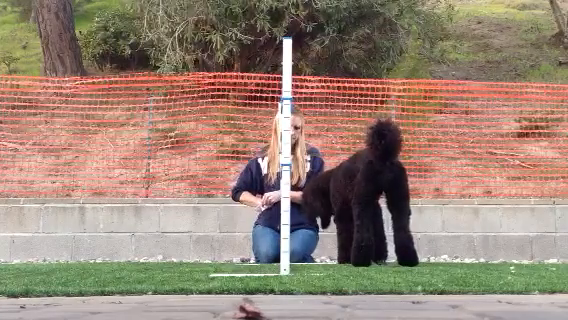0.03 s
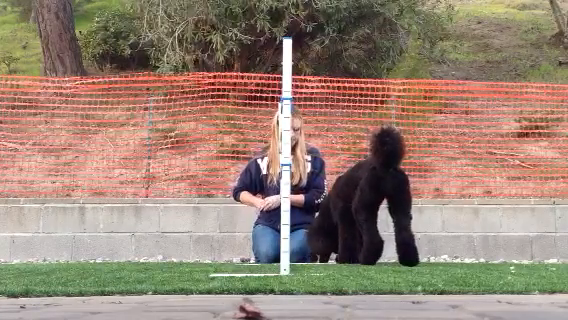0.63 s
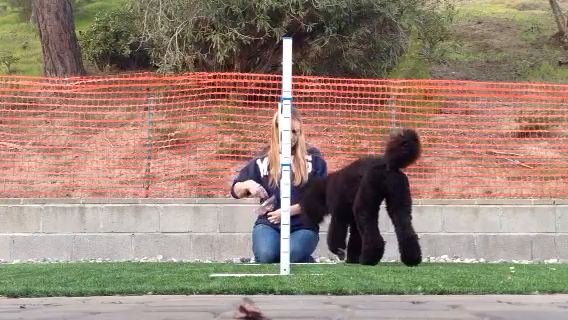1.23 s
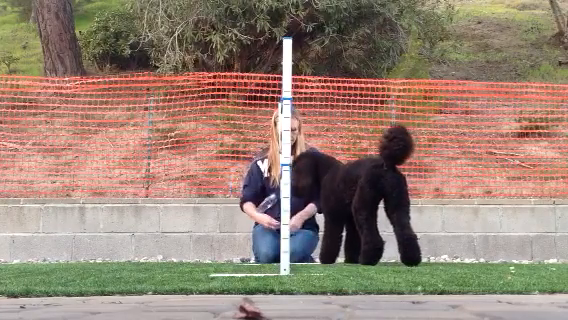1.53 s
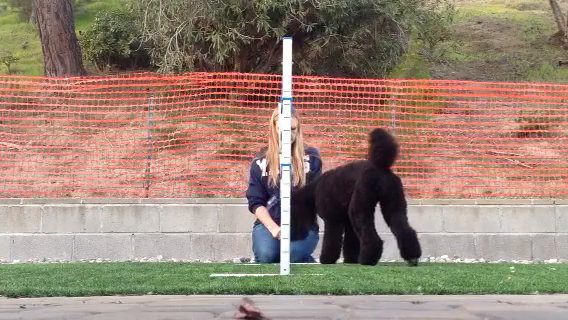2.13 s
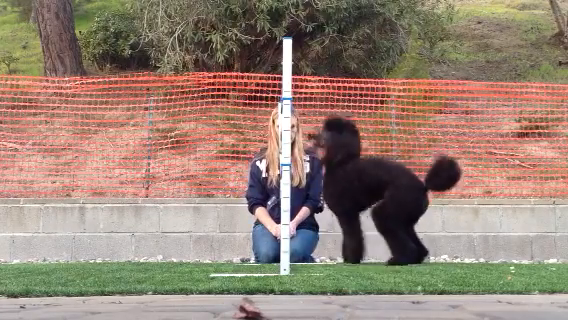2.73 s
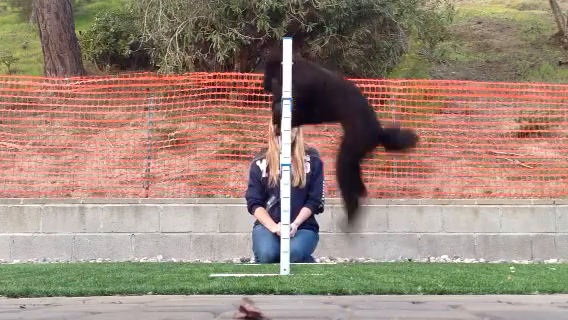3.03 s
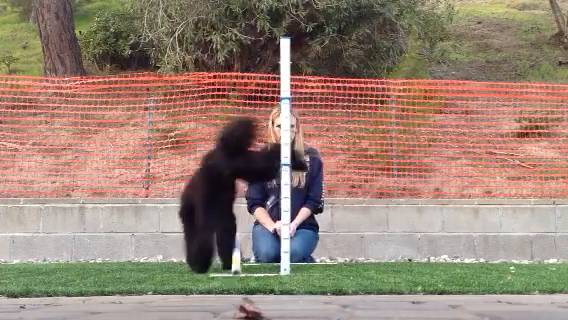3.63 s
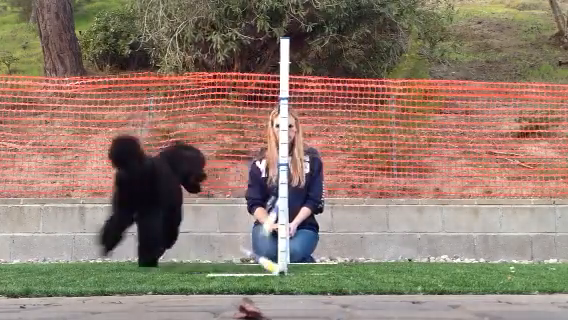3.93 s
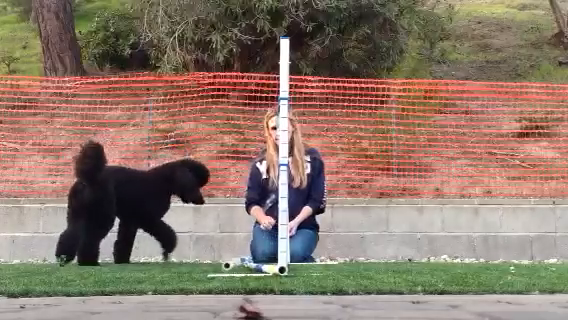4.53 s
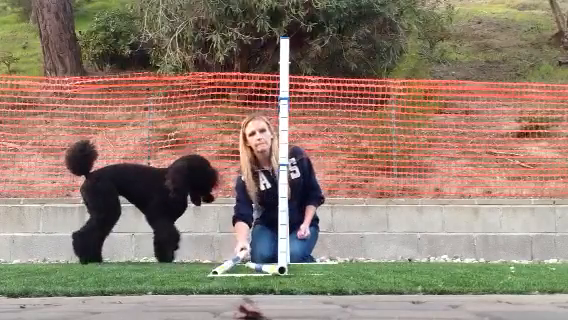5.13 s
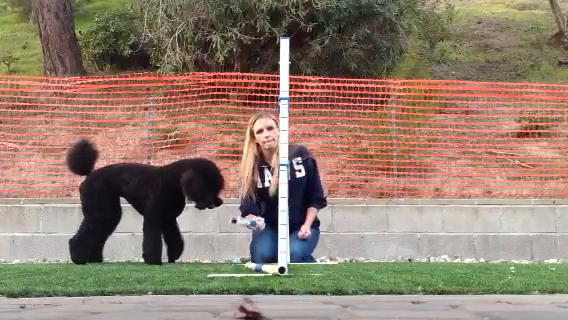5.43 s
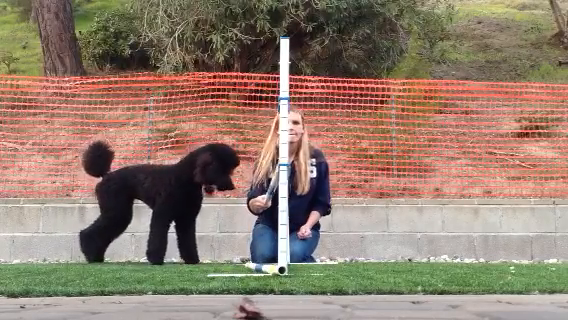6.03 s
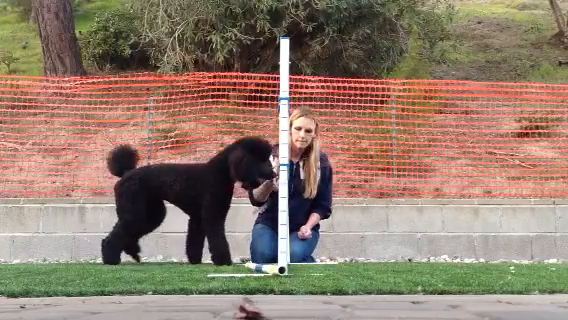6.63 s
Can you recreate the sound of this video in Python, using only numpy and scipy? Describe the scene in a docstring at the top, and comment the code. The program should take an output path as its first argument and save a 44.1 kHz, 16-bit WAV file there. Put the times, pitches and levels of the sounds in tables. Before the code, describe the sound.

Far traffic hums quietly outdoors under a soft rustle of clothing and a few light paw steps. About halfway through, a plastic tube clatters off its supports, gives one sharp, hollow crack and tumbles onto turf, each knock ringing briefly in the yard. A bird peeps faintly once, and near the end a small clicker snaps twice in quick succession. A distant insect is barely audible behind it all.

```python
"""A walled yard: a dog clips a hollow plastic jump bar, which rattles off its cups, cracks against the
upright and bounces end over end on the grass, each impact exciting the tube's damped normal modes.
Paws and clothes rustle by friction. Later a training clicker is pressed and let go, its steel tongue
snapping over and ringing its box. Distant traffic murmurs behind it all, with a faint insect and one
peep of a bird."""
import sys
import numpy as np
from scipy import signal
from scipy.fft import rfft, irfft
from scipy.io import wavfile
from scipy.ndimage import uniform_filter1d

SR = 44100
rng = np.random.default_rng(int(sys.argv[2]) if len(sys.argv) > 2 else 0)


def master_out(mix):
    """Clip the mix to full scale and print it as 16-bit PCM to the path in sys.argv[1]."""
    frames = np.transpose(np.atleast_2d(mix))
    ceiling = np.clip(frames, -1, 1)
    pcm = np.round(ceiling * 32767).astype(np.int16)
    wavfile.write(sys.argv[1], SR, pcm)


N = 302967
TIME = np.arange(N) / SR
SHORT = TIME[:SR // 2]

# loudness of the distant traffic, in two runs of points: t/s, level/dB
TRAFFIC_LEVEL = [
    [(0.0, -57), (0.92, -59), (2.07, -57), (3.3, -57)],
    [(4.9, -61), (6.074, -60.5), (6.254, -60), (6.87, -59)],
]
# spectral densities of traffic rumble, tyre noise and steady hiss: f/Hz, level/dB
RUMBLE_SPECTRUM = [(20, -28.5), (50, -28), (80, -11.5), (110, -4.5), (140, 2.5), (190, 2), (260, -0.5),
                   (400, -9), (800, -27)]
TYRE_SPECTRUM = [(150, -24.5), (300, 2), (450, 3), (900, 5), (1300, 1.5), (1700, -3.5), (2300, -8.5),
                 (3500, -19.5), (8000, -43)]
HISS_SPECTRUM = [(1000, -2), (2500, -4), (4000, -3.5), (5400, -5.5), (6200, -5.5), (9000, -6),
                 (15500, -10.5)]

# movements of clothes and grass: middle t/s, half-width/s, level/dB
MOVEMENTS = [(0.017, 0.095, -56), (0.238, .1, -63.5), (0.406, 0.054, -56.5), (0.559, 0.082, -57),
             (0.953, 0.23, -62.5), (1.155, 0.094, -59)]
# crisp ticks in the rustle: t/s, level/dB
RUSTLE_TICKS = [(.014, -57), (0.053, -56), (0.385, -55), (.404, -56), (0.602, -53.5), (.831, -64),
                (0.9354, -57), (1.0523, -55), (1.208, -62), (3.167, -59.5), (6.08, -70)]
# paws on the turf: t/s, brush level/dB, thud level/dB
PAW_SCUFFS = [(2.296, -60.5, -52.5), (2.754, -64, -66), (4.636, -57, -58.5), (5.574, -65.5, -62)]
# spectral densities of the rustle, a tick and a paw's thud: f/Hz, level/dB
RUSTLE_SPECTRUM = [(800, -5), (2000, -3.5), (3500, -4), (5500, -4), (8000, -8.5), (12000, -11.5),
                   (15500, -10.5)]
TICK_SPECTRUM = [(800, -14), (3000, -5), (6000, -1), (13000, 0)]
PAW_SPECTRUM = [(150, -37), (350, -8), (550, -2), (900, -10.5), (2500, -30)]

# bar on cups, upright and ground: t/s, ring level/dB, crack level/dB, centre f/Hz, chatter time/s
BAR_IMPACTS = [ (3.348, -52, -52, 1020, 0.0047), (3.376, -44.5, -48, 1040, .0014),
               (3.396, -40, -37.5, 900, 0.015), (3.407, -40, -32.5, 950, .003),
               (3.479, -42.5, -47.5, 990, 0.0056), (3.502, -31.5, -40, 930, 0.004),
               (3.506, -36, -27, 1040, .011), (3.5718, -45, -37, 1102, 0.0074),
               (3.585, -30.5, -29.5, 1020, 0.0058), (3.6718, -10, -19.5, 1560, .0018),
               (3.6746, -10, -17.5, 1800, .0035), (3.739, -28.5, -29, 1040, 0.0075),
               (3.7508, -17, -31, 1560, .001), (3.829, -38.5, -50, 1030, 0.01),
               (3.958, -41, -39, 1120, 0.0042), (4.005, -27.5, -32.5, 2420, 0.016),
               (4.008, -31, -38, 810, 0.018), (4.046, -25.5, -30.5, 1020, 0.014),
               (4.154, -38, -47, 1150, 0.01), (4.172, -22, -29, 1030, 0.009),
               (4.225, -37, -42, 1570, 0.0094), (4.276, -37.5, -57, 1210, 0.0043),
               (4.408, -40, -54, 1080, 0.011), ]
# normal modes of the tube: f/Hz, level/dB, T60/s
TUBE_MODES = [(590, -4, .06), (770, -2, .05), (830, -2, .05), (880, -4, .07), (965, -3, .05),
              (1114, -1, .07), (1160, -3, .05), (1250, -4, .035), (1330, 0, .055), (1400, -4, .04),
              (1460, -3, .045), (1641, 1, .07), (1722, 4, .065), (1895, -1, .06), (2070, -7, .04),
              (2250, -6, .055), (2480, -5, .04), (2570, -8, .05), (2682, -3, .065), (2998, -9, .05),
              (3352, -5, .05)]
# spectral densities of the plastic's crack, the ground's thump and the turf's thud: f/Hz, level/dB
CRACK_SPECTRUM = [(40, -42), (150, -16), (350, -5), (600, 0.5), (1000, -1), (2000, 1), (3000, 3),
                  (4000, 3.5), (4800, 5), (7500, 3), (10000, 0), (14000, 0), (16000, -12.5)]
THUMP_SPECTRUM = [(25, 3.5), (70, -4), (200, -1), (400, -13), (1000, -44.5)]
TURF_SPECTRUM = [(150, -30), (330, -1), (550, 1), (900, -10), (2500, -29)]
# reverberation time of the yard: f/Hz, T60/s
YARD_DECAY = [(200, 0.34), (1200, 0.29), (4000, 0.34), (9000, 0.218), (15000, 0.34)]
# bar sliding in its cups, down the upright and through grass: t/s, duration/s, level/dB, fade/(dB/s)
BAR_SLIDES = [(3.383, 0.27, -43, 170), (3.691, 0.083, -28.5, 170), (4.168, 0.024, -40.5, 157),
              (4.272, 0.033, -53.5, 67)]

# clicker pressed and let go: t/s, box level/dB, box centre f/Hz, tongue level/dB, snap level/dB
CLICKER_SNAPS = [(6.1968, -35.5, 1140, -36.5, -41.5), (6.3183, -50, 1050, -60, -59),
                 (6.34, -42.5, 935, -45.5, -44), (6.3423, -44, 960, -44, -43.5)]
# normal modes of its plastic box and steel tongue: f/Hz, level/dB, T60/s
BOX_MODES = [(880, -6, .035), (950, -3, .04), (1100, -4, .035), (1163, 0, .05), (1400, -8, .02),
             (1572, -4, .025), (2050, -4, .02)]
TONGUE_MODES = [(1750, -3, .012), (2200, -7, .01), (3219, 0, .018), (3400, -2, .012), (3850, 1, .012),
                (4400, -4, .008), (5600, -2, .008), (6900, -8, .008), (8409, -9, .008), (11800, -8, .006),
                (13700, -7, .006)]
# spectral density of its snap: f/Hz, level/dB
SNAP_SPECTRUM = [(400, -20), (950, 2), (1600, 3), (2700, -1), (4500, 2), (8000, -3), (14000, -5)]


def from_db(db):
    """Amplitude ratio of a level in decibels."""
    return 10 ** (np.asarray(db) / 20)


def unit_rms(x):
    """Power normalisation to rms 1."""
    return x / np.sqrt(np.mean(x ** 2) + 1e-20)


def unit_burst(x):
    """Energy normalisation to that of 10 ms at rms 1."""
    return x / np.sqrt(np.sum(x ** 2) / (SR / 100) + 1e-20)


def at_hz(points, hz):
    """Interpolation on a logarithmic frequency axis."""
    f, value = np.transpose(points)
    return np.interp(np.log(np.maximum(hz, 1)), np.log(f), value)


def colour(x, spectrum, size=4096):
    """Minimum-phase filtering: folding the cepstrum makes the response causal."""
    cepstrum = irfft(np.log(from_db(at_hz(spectrum, np.fft.rfftfreq(size, 1 / SR)))))
    cepstrum[1:size // 2] *= 2
    cepstrum[size // 2 + 1:] = 0
    response = irfft(np.exp(rfft(cepstrum)))
    return signal.fftconvolve(x, response)[:len(x)]


def noise(spectrum):
    """Stationary coloured noise of rms 1."""
    return unit_rms(colour(rng.standard_normal(N), spectrum))


def fluctuation(samples):
    """A moving average of white noise wanders slowly, at rms 1."""
    return unit_rms(uniform_filter1d(rng.standard_normal(N), size=samples))


def swell(middle_s, half_width_s):
    """Gaussian envelope of height 1, down to 1/e at the half-width."""
    return np.exp(-((TIME - middle_s) / half_width_s) ** 2)


def add(out, s, sound):
    """Superposition of a sound starting at time s."""
    at = int(s * SR)
    out[at:at + len(sound)] += sound[:len(out) - at]


def ring(force, modes, low_hz=620):
    """Damped modes sum with a sign and strength set by the driving point; a thin body radiates no bass."""
    out = 0
    for hz, db, t60 in modes:
        radius, angle = from_db(-60 / (t60 * SR)), 2 * np.pi * hz / SR
        mode = signal.lfilter([1, 0, -1], [1, -2 * radius * np.cos(angle), radius * radius], force)
        out = out + unit_burst(mode) * from_db(db + rng.standard_normal()) * rng.choice([-1, 1])
    return unit_burst(signal.sosfilt(signal.butter(4, low_hz, "high", fs=SR, output="sos"), out))


def background(rumble_db=-3.5, tyres_db=-0.5, engine_hz=173, engine_db=-61.5, hiss_db=-69):
    """Incoherent sources add: far traffic, an engine drone that swells and fades once, an even hiss."""
    times, levels = np.vstack(TRAFFIC_LEVEL).T
    level_db = np.interp(TIME, times, levels)
    rumble = from_db(level_db + rumble_db) * noise(RUMBLE_SPECTRUM)
    tyres = from_db(level_db + tyres_db) * noise(TYRE_SPECTRUM)
    pitch_hz = engine_hz * (1 + .03 * fluctuation(samples=4000))
    drone = np.sqrt(2) * np.sin(2 * np.pi * np.cumsum(pitch_hz) / SR)
    engine = from_db(engine_db) * swell(middle_s=0.32, half_width_s=0.38) * drone
    return rumble + tyres + engine + from_db(hiss_db) * noise(HISS_SPECTRUM)


def insect(level_db=-76.5, hz=5350, pulses_per_s=6.6):
    """Amplitude modulation of a narrow noise band gives a far insect's soft, uneven chirr."""
    pace = pulses_per_s * (1 + .25 * fluctuation(samples=6000))
    pulses = np.sin(np.pi * np.cumsum(pace) / SR) ** 2 * from_db(2 * fluctuation(samples=6000))
    carrier = ring(rng.standard_normal(N), [(hz, 0, .003)])
    return from_db(level_db) * unit_rms(carrier * pulses)


def friction(clump_samples, clump_db, grain_db=4):
    """Friction is a dense run of tiny slips whose log-normal strengths come in clumps."""
    strength_db = clump_db * fluctuation(clump_samples) + grain_db * rng.standard_normal(N)
    return rng.standard_normal(N) * from_db(strength_db)


def contact(chatter_s, grain_db):
    """The force of an impact is an exponentially dying cluster of tiny uneven touches."""
    touches = rng.standard_normal(len(SHORT)) * from_db(grain_db * rng.standard_normal(len(SHORT)))
    return touches * np.exp(-SHORT / chatter_s)


def burst(spectrum, chatter_s, grain_db):
    """A filtered contact force gives a transient without ringing modes."""
    return unit_burst(colour(contact(chatter_s, grain_db), spectrum))


def rustle(trim_db=-1):
    """Friction noise of cloth and grass follows each movement, with a few crisp ticks on top."""
    motion = sum(from_db(db) * swell(s, half_width_s) for s, half_width_s, db in MOVEMENTS)
    rubbing = unit_rms(colour(friction(clump_samples=150, clump_db=3.5), RUSTLE_SPECTRUM))
    out = from_db(trim_db) * motion * rubbing
    for s, db in RUSTLE_TICKS:
        add(out, s, from_db(db) * burst(TICK_SPECTRUM, chatter_s=.0015, grain_db=2))
    return out


def paws(rise_s=0.0265):
    """Soft contact builds slowly: a paw brushes the blades and presses dully into the ground."""
    out, blades, ground = np.zeros(N), noise(RUSTLE_SPECTRUM), noise(PAW_SPECTRUM)
    for s, brush_db, thud_db in PAW_SCUFFS:
        age = np.maximum(TIME - s, 0) / rise_s
        out += age * np.exp(1 - age) * (from_db(brush_db) * blades + from_db(thud_db) * ground)
    return out


def favour(modes, centre_hz, focus_db):
    """Selective excitation: the place of contact drives the modes near one frequency most strongly."""
    return [(hz, db - focus_db * np.log2(hz / centre_hz) ** 2, t60) for hz, db, t60 in modes]


def blow(ring_db, crack_db, centre_hz, chatter_s, treble_hz=4800):
    """One impact force gives both modal ringing and a broadband crack, duller for soft contacts."""
    force = contact(chatter_s, grain_db=5.5)
    tube = ring(force, favour(TUBE_MODES, centre_hz, focus_db=20))
    tilt_db_per_octave = 0.2 * (crack_db - ring_db)
    spectrum = [(hz, db + tilt_db_per_octave * max(np.log2(hz / treble_hz), 0))
                for hz, db in CRACK_SPECTRUM]
    crack = unit_burst(colour(force, spectrum))
    return from_db(ring_db) * tube + from_db(crack_db) * crack


def yard(x, wet_db, build_s):
    """Scattering from wall, bank and bushes adds a short diffuse tail, different for each spot."""
    tail, edges_hz = 0, np.geomspace(150, 18000, 6)
    for low, high in zip(edges_hz, edges_hz[1:]):
        bandpass = signal.butter(2, [low, high], "band", fs=SR, output="sos")
        band = signal.sosfilt(bandpass, rng.standard_normal(len(SHORT)))
        t60 = at_hz(YARD_DECAY, np.sqrt(low * high))
        tail = tail + band * from_db(-60 * SHORT / t60)
    tail = tail * (1 - np.exp(-(SHORT / build_s) ** 2))
    return x + from_db(wet_db) * signal.fftconvolve(x, tail / np.linalg.norm(tail))[:len(x)]


def bar_impacts(rebound_s=.0118, touchdown_s=4.03, thump_re_ring_db=-40, turf_re_ring_db=-18.5):
    """Elastic rebound: the tube slaps back after each blow, weaker and less cleanly, over a low thump."""
    out = np.zeros(N)
    for s, ring_db, crack_db, centre_hz, chatter_s in BAR_IMPACTS:
        knock = blow(ring_db, crack_db, centre_hz, chatter_s)
        rebound = blow(ring_db - 11.5, crack_db - 2.5, centre_hz, chatter_s + 0.0039)
        add(knock, rebound_s, rebound)
        add(out, s, yard(knock, wet_db=-10, build_s=0.0063))
        thump = burst(THUMP_SPECTRUM, chatter_s=0.01225, grain_db=-0.5)
        add(out, s, from_db(ring_db + thump_re_ring_db) * thump)
        if s > touchdown_s:   # landings on the turf add a hollow thud
            thud = burst(TURF_SPECTRUM, chatter_s=0.053, grain_db=-0.5)
            add(out, s, from_db(ring_db + turf_re_ring_db) * thud)
    return out


def bar_slides(attack_s=0.024, tube_db=-4):
    """Frictional excitation: the sliding bar's slips hiss and keep its lower modes ringing."""
    pressure = np.zeros(N)
    for s, duration_s, db, fade_db_per_s in BAR_SLIDES:
        onset = np.clip((TIME - s) / attack_s, 0, 1)
        pressure += onset * from_db(db - fade_db_per_s * np.maximum(TIME - s - duration_s, 0))
    slips = friction(clump_samples=250, clump_db=3)
    hiss = unit_rms(colour(slips, CRACK_SPECTRUM))
    tube = unit_rms(ring(slips, favour(TUBE_MODES[:10], centre_hz=1030, focus_db=59)))
    return pressure * (hiss + from_db(tube_db) * tube)


def bird(level_db=-68, hz=3100):
    """A sharp resonance, driven by noise under a brief envelope, gives a single peep."""
    tone = unit_rms(ring(rng.standard_normal(N), [(hz, 0, .02)]))
    return from_db(level_db) * tone * swell(middle_s=5.145, half_width_s=0.026)


def clicker():
    """Snap-through of a steel tongue sets its small plastic box ringing, lower on release."""
    out = np.zeros(N)
    for s, box_db, centre_hz, tongue_db, snap_db in CLICKER_SNAPS:
        force = contact(chatter_s=.002, grain_db=2)
        box = from_db(box_db) * ring(force, favour(BOX_MODES, centre_hz, focus_db=19))
        tongue = from_db(tongue_db) * ring(force, TONGUE_MODES)
        snap = from_db(snap_db) * burst(SNAP_SPECTRUM, chatter_s=.006, grain_db=2)
        add(out, s, yard(box + tongue, wet_db=-12.5, build_s=.005))
        add(out, s, yard(snap, wet_db=-3, build_s=0.0034))
    return out


def gain_control(x, threshold_db=-20.5, ratio=2, release_db_per_s=6):
    """Compression: a loud blow turns the gain down at once, and it creeps back up afterwards."""
    level_db = 10 * np.log10(np.maximum(uniform_filter1d(x ** 2, size=440), 1e-12))
    cut_db = (1 - 1 / ratio) * np.maximum(level_db - threshold_db, 0)
    recovery_db = release_db_per_s * TIME
    held_db = np.maximum.accumulate(cut_db + recovery_db, axis=-1) - recovery_db
    return x * from_db(-uniform_filter1d(held_db, size=100))


def scene():
    """Linear superposition of the yard's sources in one channel."""
    return (background() + insect() + rustle() + paws()
            + bar_impacts() + bar_slides() + bird() + clicker())[None]


def record(dry, bass_cut_hz=55, treble_cut_hz=15450):
    """Band limiting: a small microphone loses deep bass; after compression the top is cut steeply."""
    highpass = signal.butter(2, bass_cut_hz, "high", fs=SR, output="sos")
    lowpass = signal.ellip(12, .1, 80, treble_cut_hz, fs=SR, output="sos")
    return signal.sosfilt(lowpass, gain_control(signal.sosfilt(highpass, dry)))


dry = scene()
out = record(dry)
master_out(out)
```